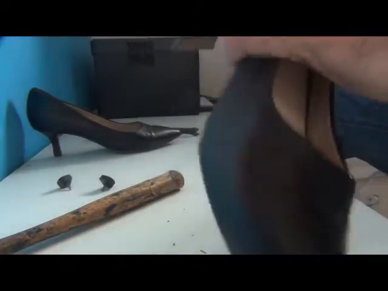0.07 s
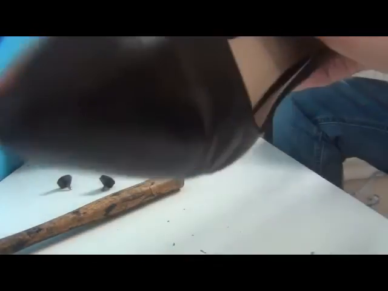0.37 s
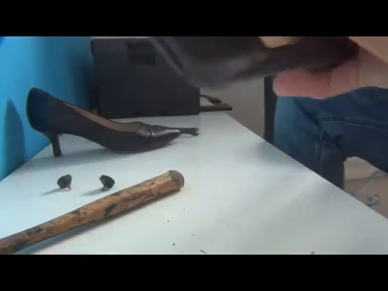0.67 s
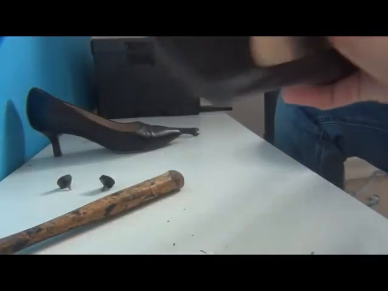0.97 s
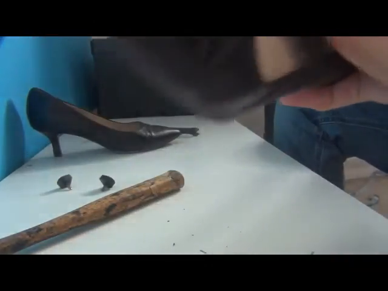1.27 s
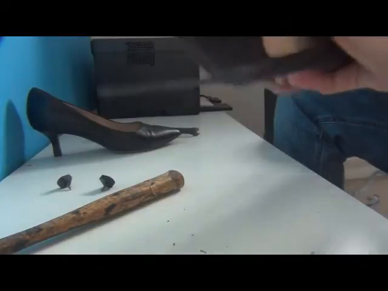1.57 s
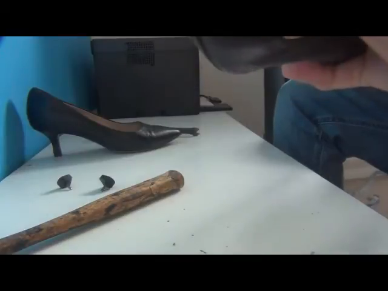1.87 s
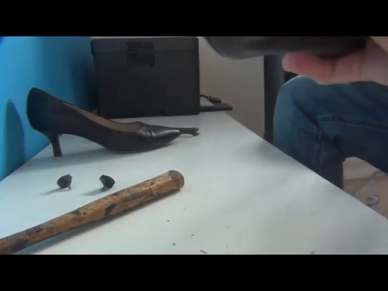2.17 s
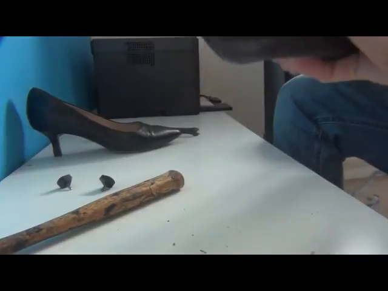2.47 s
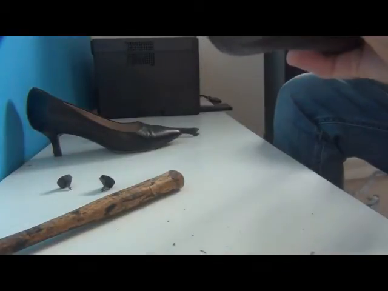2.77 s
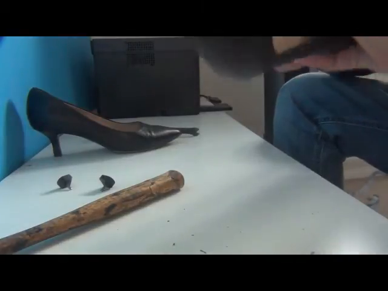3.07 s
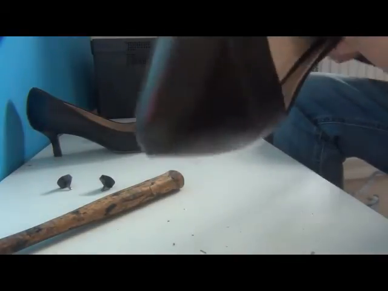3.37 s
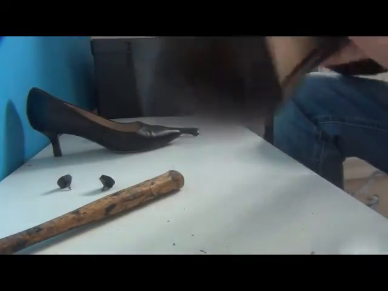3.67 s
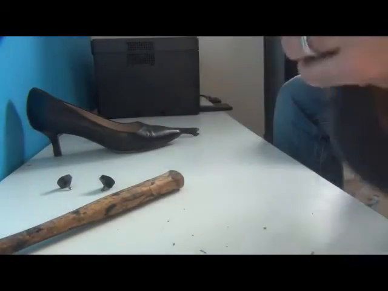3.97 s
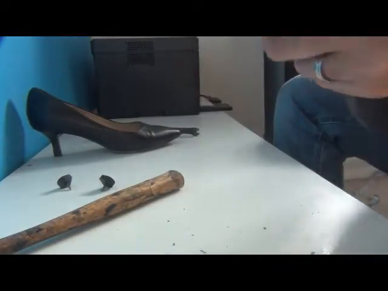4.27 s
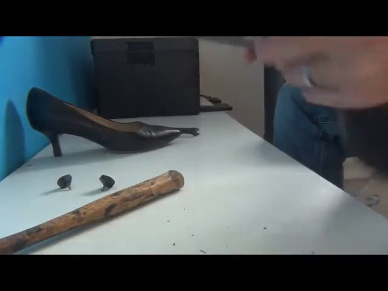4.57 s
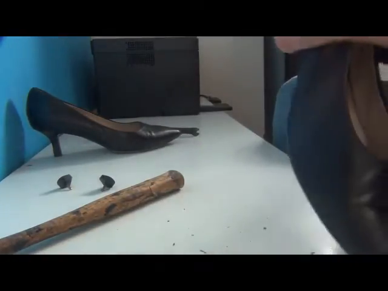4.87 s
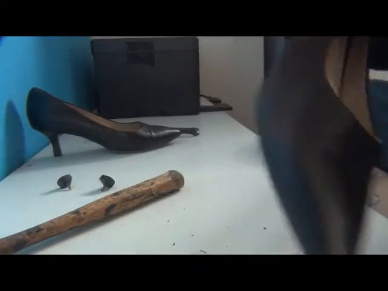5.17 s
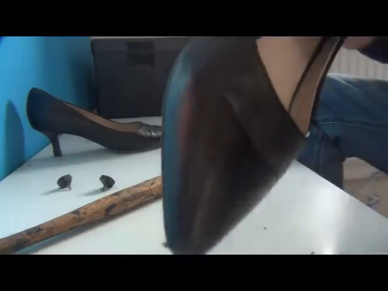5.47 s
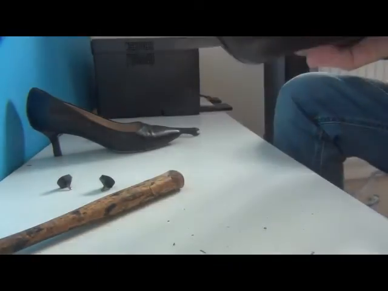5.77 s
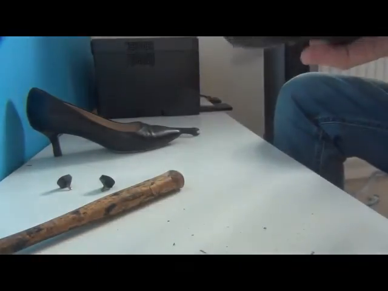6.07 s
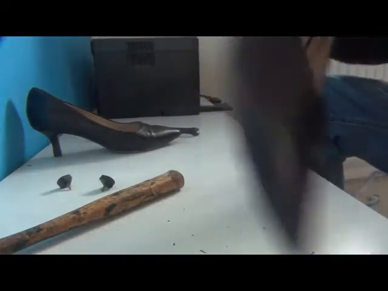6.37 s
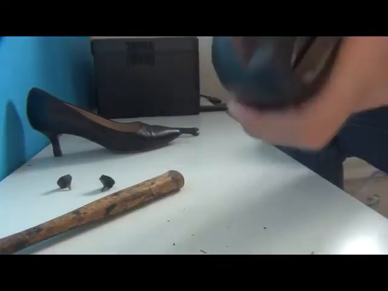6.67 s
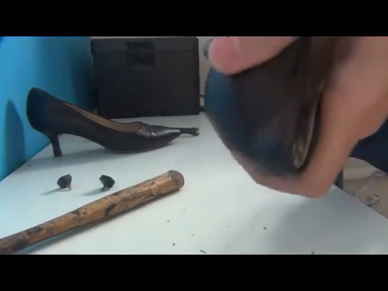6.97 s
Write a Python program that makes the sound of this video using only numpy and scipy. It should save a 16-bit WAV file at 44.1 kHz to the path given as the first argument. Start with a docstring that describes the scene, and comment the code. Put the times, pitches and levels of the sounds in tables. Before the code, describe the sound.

Short, hissing scrapes of a metal file on a shoe heel, quick at first and then slower, with small handling ticks between.

```python
"""A soft rub and a tick of fingers on leather, then a knock: a steel file lands on the heel of a hand-held
shoe, above a table in a small room. Pushed across the heel, its teeth rasp, hiss and sing a note that
rises and falls with the speed of each stroke; the blade rings when it slips over the edge. A quick run of
strokes gives way to slower ones. Between strokes the fingers turn the shoe, rubbing and ticking."""
import sys
import numpy as np
from scipy import signal
from scipy.fft import rfft, irfft, next_fast_len
from scipy.io import wavfile
from scipy.ndimage import uniform_filter1d

SR = 44100
rng = np.random.default_rng(int(sys.argv[2]) if len(sys.argv) > 2 else 0)


def dump(signal):
    """Clip the signal to [-1, 1] and save it as 16-bit WAV at the path in sys.argv[1]."""
    limited = np.clip(np.atleast_2d(signal).T, -1, 1)
    pcm = np.round(limited * 32767).astype(np.int16)
    wavfile.write(sys.argv[1], SR, pcm)


N = 310023
TIME = np.arange(N) / SR

# Levels in the tables are relative: each layer sets its own trim.
# tone curves, all with columns frequency_hz, level_db
ROOM_CURVE = [(12, -30), (20, -14), (232, -1), (363, -9), (536, -6.5), (652, -7.5), (709, -7), (862, -5.5),
              (1020, -11.5), (1270, -9), (1380, -14.5), (1550, -11), (1990, -14), (3380, -20.5),
              (15600, -30)]   # low, dull room air
RUB_CURVE = [(150, 0), (250, -15), (371, 3), (410, 0), (477, 1), (653, -3), (989, 12), (1350, -12),
             (1780, -2.5), (2800, -10.5), (3640, -46), (6160, -120)]   # skin dragging on leather
SWISH_CURVE = [(1350, -14), (2300, -9), (3430, -7), (4480, -11.5), (4970, -10), (6850, -19.5),
               (11800, -22.5), (15600, -28)]   # the airy top of slides and ticks
TICK_CURVE = [(120, -15), (350, -6), (600, -6), (930, -4.5), (1400, -19.5), (2000, -15), (3400, -19),
              (4500, -33), (9000, -51)]   # the dull body of a tick
RASP_CURVE = [(59, -56), (100, -25.5), (198, -20.5), (433, -7.5), (624, -14.5), (832, 4), (1090, 5.5),
              (1260, -4), (1410, 3), (1550, -26.5), (1790, -2.5), (2270, -8.5), (2660, -7.5), (2930, -7.5),
              (4500, -6.5), (5850, -35), (9900, -120)]   # the coarse midrange of the file
HISS_CURVE = [(2350, -50.5), (4000, 0), (5050, 0.5), (5440, -3), (5900, -3), (6720, -6), (7580, -10),
              (8740, -14.5), (10900, -12), (14200, -20.5), (15600, -28)]   # the fine treble of the file
# faint hum in the room: pitch_hz, level_db
HUM_TONES = [(129.2, -73.5), (253.0, -102), (393.0, -74.5)]
# bounces off table and wall: delay_s, level_db
ECHOES = [(.0024, -10.5), (.0041, -80)]
# stereo side signal relative to the mid: frequency_hz, level_db
SIDE_CURVE = [(100, -42), (500, -31.5), (1000, -25), (2200, -19), (4500, -17), (8000, -13), (13000, -37)]
# fingers slide on the leather: start_s, attack_s, length_s, rub_db, swish_db, fade_db_per_s
FINGER_SLIDES = [(0.0, 0.0013, 0.048, -45, -43.5, 56), (0.227, .005, 0.25, -42, -51.5, 49),
                 (3.089, 0.0095, 0.037, -40, -52.5, 67), (3.735, 0.0046, .16, -55.5, -51.5, 12),
                 (3.924, 0.012, 0.24, -55, -61, 24), (4.681, .02, 0.25, -54.5, -58.5, 71),
                 (5.266, 0.0045, 0.055, -44, -52, 53), (6.332, 0.037, 0.3, -51, -52.5, 9),
                 (6.633, 0.024, 0.33, -63.5, -63.5, -6)]
# shoe and file slip in the grip, and the file ticks as some strokes begin: start_s, body_db, snap_db
GRIP_TICKS = [(0.029, -31.5, -33), (0.044, -54, -41), (0.294, -32.5, -39.5), (0.406, -42, -46),
              (0.451, -40.5, -43.5), (0.735, -33, -34.5), (1.025, -29, -60), (1.631, -42, -54),
              (1.688, -45.5, -47.5), (2.848, -31.5, -62), (3.19, -41, -52), (3.224, -38.5, -62),
              (3.251, -40, -46.5), (3.273, -38, -45.5), (3.7575, -30, -31.5), (4.009, -44, -42),
              (4.071, -37.5, -43.5), (4.193, -47, -47.5), (4.791, -62, -48.5), (4.843, -46.5, -52),
              (6.207, -41, -55), (6.404, -56, -44.5), (6.529, -44, -63), (7, -46, -46)]
# the file lands on the heel: start_s, grit_db, thump_db, clack_db, thump_cutoff_hz (low when soft)
LANDINGS = [(0.078, -17, -23.5, -29, 1300), (0.541, -7.5, -22.5, -46.5, 427), (2.239, -20.5, -28, -44, 626),
            (2.815, -25, -35.5, -60, 480), (3.4908, -14.5, -20, -26.5, 1602),
            (4.375, -7, -26.5, -26.5, 789), (5.045, -18, -19, -43.5, 1019), (5.567, -14, -22, -26, 1296),
            (6.032, -11, -31.5, -41.5, 1300), (6.097, -31, -29.5, -50, 2500)]
# ringing of heel and shoe (thump, clack) and of the steel blade: pitch_hz, level_db, t60_s
THUMP_MODES = [(162, -37, 0.12), (397.5, -7.5, 0.11), (495, -17, 0.078), (825, 8, 0.027), (944, 19, 0.032),
               (1158, -13.5, 0.068)]
CLACK_MODES = [(1848, 13.5, 0.028), (2160, -3, 0.026), (2350, 23, 0.0056), (2780, 16, 0.015),
               (3380, 8, 0.014)]
BLADE_MODES = [(1400, -3, 0.52), (1313, 20.5, 0.061), (2670, 13, 0.06), (5450, -25.5, 0.036)]
# the blade slips over the edge of the heel: start_s, level_db
EDGE_SLIPS = [(2.426, -22), (3.03, -21), (4.571, -55), (5.129, -26), (5.256, -27.5), (6.099, -20.5),
              (6.117, -26)]
# resonances and gaps of shoe and file: centre_hz, width_hz, gain_db
SHOE_BANDS = [(143, 49, 14), (352, 480, 7.5), (458.4, 6.7, 14), (975, 51, 2), (1253, 39, -7),
              (1777, 290, 10), (2241, 82, 11), (2974, 334, 11.5), (3450, 160, 8.5), (4320, 830, -6.5),
              (6560, 690, -3), (9740, 439.5, 3)]
# notes of the crossed tooth rows, and high overtones of the teeth: tooth_rate_multiple, level_db
CROSS_ROW_NOTES = [(0.7, -19), (1.4, -21.5), (1.68, -13)]
TOOTH_OVERTONES = [(3, -7), (4, -20)]
# the teeth dig in: centre_s, half_length_s, rasp_db, hiss_db, note_db, speed_lost_share
TOOTH_SNAGS = [(0.166, 0.018, 3.5, -3, 17.5, 0.0038), (0.197, 0.0096, 1, 3, 14, .05),
               (0.557, 0.018, 1, 6, 30, 0), (0.654, 0.0075, 3.5, -4, 7.5, 0.02),
               (0.929, 0.013, 2.5, 4.5, -9, 0), (1.178, 0.009, 9, 6, 7.5, 0), (1.514, .0055, 9, 6, 12, .58),
               (1.524, .005, -3.5, 3.5, 5, .5), (2.302, 0.034, 6, 4.5, 7.5, 0),
               (2.432, 0.0089, 10, 12, -11, 0.01), (2.9, .014, 0.5, -4.5, 13.5, 0.077),
               (3.035, 0.0091, 10.5, 12, 4, 0.061), (3.701, 0.015, -5.5, 5.5, -5, 0.027),
               (4.541, 0.043, 1, 6, 1, 0.025), (5.131, 0.0048, -3, 0, 4, 0.028),
               (5.219, .012, 5, 1, 6, 0.037), (5.752, .02, -1.5, 9, 6, .25),
               (5.775, 0.018, -7.5, -7, 30.5, 0.012), (6.111, 0.0037, 5.5, 9, -4, 0.0071)]
# one push or pull of the file:
#   motion: start_s, speed_up_s, slow_down_s, sluggishness_exponent, top_teeth_per_s, final_teeth_per_s,
#   pressure: attack_s, release_s,
#   levels: rasp_db, hiss_over_rasp_db, note_db, octave_db,
#   colour from the hold: overtones_db, body_db, edge_db, air_db, blade_ring_db
FILE_STROKES = [ (0.095, 0.069, 0.034, 1.3, 1140, 916, 0.034, .05, -29, -13.5, -47, -32.5, -11, 6, -0.5, -2.5, -18),
                (0.548, .112, 0.024, 1.5, 1121, 1130, 0.067, .025, -26.5, -19, -33, -33, 1, -3.5, -4, 6, 6),
                (0.745, .053, .027, 1.73, 1879, 1385, 0.03, .025, -26.5, -20, -31.5, -55, -8, 6, -7, 6.5, 9),
                (0.878, .051, 0.032, 1.24, 1660, 950, 0.031, .028, -27.5, -11.5, -29.5, -33, -8, 1.5, 0.5, -1.5, -5),
                (1.01, 0.05, 0.036, 1.08, 1740, 1080, 0.035, .03, -29.5, -19, -38, -39, 7, 4, -5.5, 1, 4),
                (1.146, 0.055, .028, 1.5, 1640, 1020, 0.023, .03, -32, -10.5, -29.5, -37.5, -7, 6, -0.5, 10.5, 4),
                (1.272, .07, .038, 1.7, 1780, 983, 0.043, 0.036, -33.5, -13, -25.5, -40.5, 9, 6, -3, 11, 10),
                (1.426, 0.079, 0.024, 0.97, 2520, 2000, 0.021, .012, -26, -11.5, -26, -37.5, 3, 8.5, 0, 3, -9),
                (2.248, .108, .095, 1.4, 1889, 1150, 0.03, .032, -33, -5.5, -34.5, -39.5, 7, 2.5, 0, -8.5, 0),
                (2.825, .16, 0.061, 1.56, 1685, 1019, 0.068, .03, -29, -10.5, -39, -39.5, -7, -2, -4, -4.5, 0.5),
                (3.535, .098, .085, 1.5, 1970, 1050, .05, .03, -29.5, -16, -29.5, -41.5, -14, 7, 3.5, -1, -10),
                (4.392, 0.12, 0.063, 0.88, 1440, 1275, 0.068, .018, -28.5, -13.5, -32.5, -31.5, -3, -5, -2.5, 0, 11),
                (5.062, .138, 0.059, .62, 1411, 1360, 0.12, 0.019, -26.5, -15, -33.5, -60, -20, -2, -11, 0, 8.5),
                (5.585, .11, 0.086, 1.04, 1182, 900, 0.093, .02, -30, -16, -55, -38.5, -4, 6, 3.5, 1.5, -1),
                (6.04, 0.018, 0.0258, 0.88, 656, 646, 0.011, 0.016, -40, -24, -63, -48, 1, 8, -9, -17, 7),
                (6.092, 0.0094, .021, .5, 930, 950, .005, 0.011, -25.5, -24.5, -35.5, -46, 5, -4, -4, -22, 2)]


def from_db(db):
    """Decibels to gain."""
    return 10 ** (np.asarray(db) / 20)


def rms_one(x):
    """Scale to unit power."""
    return x / np.sqrt(np.mean(x ** 2) + 1e-20)


def butter(order, hz, kind="low"):
    """A smooth filter for sosfilt or sosfiltfilt."""
    return signal.butter(order, hz, kind, fs=SR, output="sos")


def resonance(x, hz, width_hz):
    """One resonance with gain 1 at its peak."""
    r = np.exp(-np.pi * width_hz / SR)
    poles = [1, -2 * r * np.cos(2 * np.pi * hz / SR), r * r]
    return signal.lfilter(np.array([1, 0, -1]) * (1 - r * r) / 2, poles, x)


def coloured(x, curve, size=2048):
    """Shape x with a tone curve, at unit power; minimum phase keeps the attacks crisp."""
    hz, db = np.transpose(curve)
    grid = np.maximum(np.fft.rfftfreq(size, 1 / SR), 1)
    gain = from_db(np.interp(np.log(grid), np.log(hz), db))
    cepstrum = irfft(np.log(gain))
    cepstrum[1:size // 2] *= 2
    cepstrum[size // 2 + 1:] = 0
    response = irfft(np.exp(rfft(cepstrum)))
    return rms_one(signal.fftconvolve(x, response)[:N])


def drift(hz):
    """A smooth random wobble at unit power."""
    r = np.exp(-2 * np.pi * hz / SR)
    return rms_one(signal.lfilter([1], [1, -2 * r, r * r], rng.standard_normal(N + SR // 10))[-N:])


def grains(per_s, spread_db):
    """A crackle of tiny fractures of uneven size."""
    sizes = from_db(spread_db * np.minimum(rng.exponential(1, N), 4))
    return rms_one((rng.random(N) < per_s / SR) * sizes * rng.standard_normal(N))


def add(out, start_s, sound):
    """Drop a sound onto the track."""
    at = max(int(start_s * SR), 0)
    out[at:at + len(sound)] += sound[:N - at]


def ring(modes):
    """One blow on damped modes, each a little off in strength and pitch; peak 1."""
    t, out = TIME[:SR // 5], 0
    for hz, db, t60 in modes:
        scatter_db, detune = rng.normal(0, [1.5, .008])
        out = out + from_db(db + scatter_db - 60 * t / t60) * np.sin(2 * np.pi * hz * (1 + detune) * t)
    return out / np.abs(out).max()


def background(air_db=-61.4, hum_trim_db=-2):
    """A bed of quiet room air with a faint, wavering hum."""
    hum = sum(from_db(db + hum_trim_db) * np.sqrt(2) * np.sin(2 * np.pi * hz * TIME + 0.6 * drift(1.9))
              for hz, db in HUM_TONES)
    return from_db(air_db) * coloured(rng.standard_normal(N), ROOM_CURVE) + hum


def room_tail(x, t60_s, wall_hz, build_s):
    """The short, diffuse reverb of a small furnished room."""
    t = TIME[:SR // 2]
    tail = signal.sosfilt(butter(1, [150, wall_hz], "band"), rng.standard_normal(len(t)))
    tail *= from_db(-60 * t / t60_s) * (1 - np.exp(-t / build_s))
    return signal.fftconvolve(x, tail / np.linalg.norm(tail))[:N]


def bounces(x):
    """Table and wall throw the blows back at once."""
    return sum(from_db(db) * np.interp(TIME - delay, TIME, x, left=0) for delay, db in ECHOES)


def stereo_side(x, phase_rad=0.97):
    """Two close microphones differ a little in level and phase, mostly in the middle treble."""
    size = next_fast_len(N)
    hz, db = np.transpose(SIDE_CURVE)
    gain = from_db(np.interp(np.log(np.fft.rfftfreq(size, 1 / SR) + 1), np.log(hz), db))
    return irfft(rfft(x, size) * gain * np.exp(1j * phase_rad), size)[:N]


def finger_slides(rub_trim_db=-4, swish_trim_db=-2, catch_db=1.5, release_s=0.022):
    """Skin slides and catches on leather, with the deep bass cut away."""
    rub, swish, t = np.zeros(N), np.zeros(N), TIME[:SR]
    for start, attack, length, rub_db, swish_db, fade in FINGER_SLIDES:
        lift_off = np.exp(-np.maximum(t - length, 0) / release_s)
        shape = (1 - np.exp(-t / attack)) * from_db(-fade * t) * lift_off
        add(rub, start, from_db(rub_db + rub_trim_db) * shape)
        add(swish, start, from_db(swish_db + swish_trim_db) * shape)
    rub *= coloured(grains(per_s=2500, spread_db=3), RUB_CURVE)
    swish *= coloured(grains(per_s=18000, spread_db=3), SWISH_CURVE)
    catching = from_db(catch_db * drift(68))
    return signal.sosfilt(butter(2, 260, "high"), catching * (rub + swish) + 1e-18)


def ticks(trim_db=1, decay_s=0.002, skin_hz=7000):
    """Brief ticks, softened by the fingers: slips of shoe and file in the grip, and the file touching down as
    some strokes begin."""
    body, snap = np.zeros(N), np.zeros(N)
    shape = np.exp(-TIME[:SR // 20] / decay_s)
    for start, body_db, snap_db in GRIP_TICKS:
        add(body, start, from_db(body_db + trim_db) * shape)
        add(snap, start, from_db(snap_db + trim_db) * shape)
    body *= coloured(rng.standard_normal(N), TICK_CURVE)
    snap *= coloured(rng.standard_normal(N), SWISH_CURVE)
    return signal.sosfilt(butter(1, [150, skin_hz], "band"), body + snap + 1e-18)


def knocks(thump_trim_db=13, clack_trim_db=17, grit_trim_db=-35, contact_hz=3600, low_cut_hz=115):
    """Steel on the heel: hollow thump, short clack, a trace of grit; a small shoe gives no deep bass."""
    out, t = np.zeros(N), TIME[:SR // 5]
    soft_contact = signal.cheby1(5, 1, contact_hz, fs=SR, output="sos")
    for start, grit_db, thump_db, clack_db, cutoff_hz in LANDINGS:
        hollow = signal.sosfilt(butter(2, cutoff_hz), ring(THUMP_MODES))
        thump = from_db(thump_db + thump_trim_db) * hollow
        clack = from_db(clack_db + clack_trim_db) * ring(CLACK_MODES)
        grit = from_db(grit_db + grit_trim_db) * rng.standard_normal(len(t)) * np.exp(-t / 0.0048)
        add(out, start, signal.sosfilt(soft_contact, thump + clack) + grit)
    return signal.sosfilt(butter(2, low_cut_hz, "high"), out + 1e-18)


def blade_rings():
    """The file slips over the edge of the heel and rings briefly, damped by the hand."""
    out = np.zeros(N)
    for start, db in EDGE_SLIPS:
        add(out, start, from_db(db) * ring(BLADE_MODES))
    return out


def current_stroke():
    """The stroke columns at every sample; each stroke takes over 5 ms ahead of its start."""
    columns = np.array(FILE_STROKES).T
    return columns[:, np.maximum(np.searchsorted(columns[0], TIME + .005) - 1, 0)]


def snags():
    """The teeth dig in and come free: rasp, hiss and note swell or duck, and the file may brake."""
    out = np.zeros((4, N))
    for centre, half_length, *effects in TOOTH_SNAGS:
        near = np.abs(TIME - centre) < np.pi * half_length
        out[:, near] += np.outer(effects, np.exp(-((TIME[near] - centre) / half_length) ** 2))
    return out


def stroke_motion(slowest_hz=330, touch_db=-19, heel_hz=992, heel_width_octaves=0.093):
    """The hand speeds up, presses and lets go: the tooth rate, and rasp, hiss, note and octave in dB."""
    start, rise, fall, sluggish, top, final, attack, release, *levels = current_stroke()
    rasp_db, hiss_db, note_db, octave_db = levels[:4]
    snag_rasp, snag_hiss, snag_note, braking = snags()
    t = TIME - start
    letting_go = np.maximum(t - rise - fall, 0) / release
    speeding = slowest_hz + (top - slowest_hz) * np.sin(np.pi / 2 * np.clip(t / rise, 0, 1)) ** sluggish
    slowing = final + (top - final) * np.cos(np.pi / 2 * np.clip((t - rise) / fall, 0, 1))
    rate = np.maximum(np.where(t < rise, speeding, slowing) / (1 + letting_go), slowest_hz)
    rate *= 1 - np.clip(braking, 0, .8)
    touching_down = np.maximum(1 - t / attack, 0) ** 2 + np.maximum(-t, 0) / .004
    pressure_db = touch_db * np.minimum(touching_down + letting_go, 10)
    # each layer has its own slope in dB per doubling of speed
    doublings = np.log2(rate / top)
    # the hiss swells towards the fastest moment and ebbs after it
    arch = .5 - np.minimum(((t - rise) / np.where(t < rise, rise, fall + release)) ** 2, 1)
    # teeth that come at the heel's own pitch shake it harder
    in_tune = np.exp(-(np.log2(rate / heel_hz) / heel_width_octaves) ** 2)
    return (rate,
            pressure_db + rasp_db + 0.5 * doublings - in_tune + snag_rasp,
            pressure_db + rasp_db + hiss_db + 4 * doublings + 4 * arch + snag_hiss,
            pressure_db + note_db + 8 * doublings + 8 * in_tune + snag_note,
            pressure_db + octave_db - 7 * doublings)


def shoe_body(x):
    """Shoe and file lift or swallow bands of the scraping."""
    for hz, width_hz, db in SHOE_BANDS:
        x = x + (from_db(db) - 1) * resonance(x, hz, width_hz)
    return x


def contact_modes(x, modes_db, decay_s):
    """Each stroke touches another spot and stirs another set of dense, short-lived modes."""
    out, t = np.zeros(N), TIME[:SR // 50]
    bounds = [0] + [int((start - .005) * SR) for start, *_ in FILE_STROKES[1:]] + [N]
    for first, last in zip(bounds, bounds[1:]):
        response = rng.standard_normal(len(t)) * np.exp(-t / decay_s)
        response *= from_db(modes_db) / np.linalg.norm(response)
        response[0] = 1   # the direct sound
        add(out, first / SR, signal.fftconvolve(x[first:last], response / np.linalg.norm(response)))
    return out


def file_rasp(tearing, rate, body_db, edge_db, skim_hz=1450, thinning_db=-7):
    """Coarse grains: the hold shades body and edge, and fast teeth skim, stirring less low body."""
    rasp = coloured(shoe_body(tearing * grains(per_s=14000, spread_db=3)), RASP_CURVE)
    body = signal.sosfiltfilt(butter(2, 700), rasp)
    edge = resonance(rasp, hz=2600, width_hz=3900)
    skim_db = thinning_db / (1 + (skim_hz / rate) ** 6)
    return rasp + (from_db(body_db + skim_db) - 1) * body + (from_db(edge_db) - 1) * edge


def file_hiss(tearing, rasp_db, air_db, ring_db, usual_rasp_db=-33):
    """Fine grains: the hold shades the air and the blade's bright ring; a harder bite adds sparkle."""
    hiss = coloured(shoe_body(tearing * grains(per_s=14000, spread_db=2.6)), HISS_CURVE)
    air = signal.sosfiltfilt(butter(2, 9000, "high"), hiss)
    blade = resonance(hiss, hz=5320, width_hz=280)
    hiss = hiss + (from_db(air_db) - 1) * air + (from_db(ring_db) - 1) * blade
    hiss *= from_db(-.3 * ring_db)   # a free blade draws its ring from the rest of the hiss
    hiss = contact_modes(hiss, modes_db=-4, decay_s=.003)
    sparkle = signal.sosfiltfilt(butter(2, 7000, "high"), hiss)
    sparkle_db = 0.083 * np.clip(rasp_db - usual_rasp_db, -20, 10)
    return hiss + (from_db(sparkle_db) - 1) * sparkle


def tooth_note(teeth, multiple, jitter_rad, flutter_db):
    """A multiple of the tooth rate, blurred by uneven teeth and uneven bite."""
    phase = 2 * np.pi * multiple * teeth + jitter_rad * drift(56.4)
    return rms_one(np.sin(phase) * from_db(flutter_db * drift(55)))


def filing(rasp_trim_db=-3.5, hiss_trim_db=-3.78, octave_trim_db=-2, bite=0.64,
           chatter_db=1.5, unsteady_db=2.12, singing_hz=650, zipping_hz=1290):
    """Teeth cross the heel, each tearing off a burst of grains; their rate is the pitch of the note."""
    rate, rasp_db, hiss_db, note_db, octave_db = stroke_motion()
    *_, overtones_db, body_db, edge_db, air_db, ring_db = current_stroke()
    teeth = np.cumsum(uniform_filter1d(rate, size=200)) / SR   # teeth passed so far
    tearing = (1 + bite * np.cos(2 * np.pi * teeth)) * from_db(chatter_db * drift(146))
    rasp = file_rasp(tearing, rate, body_db, edge_db)
    hiss = file_hiss(tearing, rasp_db, air_db, ring_db)
    # slow teeth only plough; the further notes come in as the stroke gathers speed
    singing = 1 / (1 + (singing_hz / rate) ** 4)
    zipping = 1 / (1 + (zipping_hz / rate) ** 8)
    for multiple, db in CROSS_ROW_NOTES:
        rasp += singing * from_db(db) * tooth_note(teeth, multiple, jitter_rad=1.96, flutter_db=-0.5)
    for multiple, db in TOOTH_OVERTONES:
        overtone = tooth_note(teeth, multiple, jitter_rad=.4, flutter_db=3)
        hiss += zipping * from_db(db + overtones_db) * overtone
    note = from_db(note_db) * tooth_note(teeth, 1, jitter_rad=.8, flutter_db=3)
    octave = from_db(octave_db + octave_trim_db) * tooth_note(teeth, 2, jitter_rad=1.7, flutter_db=4)
    scrape = from_db(rasp_db + rasp_trim_db) * rasp + from_db(hiss_db + hiss_trim_db) * hiss
    strokes = from_db(unsteady_db * drift(20)) * (scrape + note + singing * octave)
    return contact_modes(strokes, modes_db=-11.5, decay_s=0.0032)


def scene(wet_db=-17, side_air_db=-84):
    """The work sits close and a little to the right, in a narrow stereo image."""
    blows = knocks() + ticks()
    work = filing() + blade_rings() + finger_slides() + blows + bounces(blows)
    reverb = room_tail(work, t60_s=0.18, wall_hz=1830, build_s=0.0003)
    mid = work + from_db(wet_db) * reverb + background()
    side = -stereo_side(work + room_tail(work, t60_s=0.12, wall_hz=7000, build_s=0.0009))
    side += from_db(side_air_db) * coloured(rng.standard_normal(N), ROOM_CURVE)
    return np.array([mid + side, mid - side])


def record(dry):
    """A steep high cut at 15650 Hz."""
    return signal.sosfilt(signal.ellip(12, .1, 80, 15650, fs=SR, output="sos"), dry)


dry = scene()
out = record(dry)
dump(out)
```